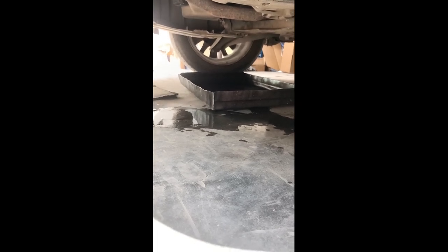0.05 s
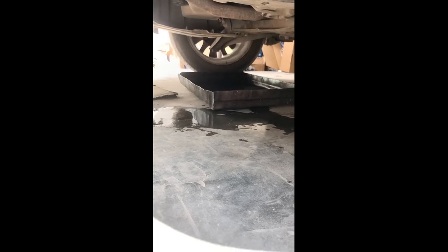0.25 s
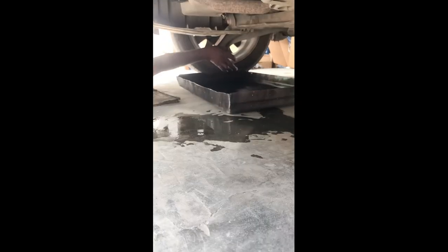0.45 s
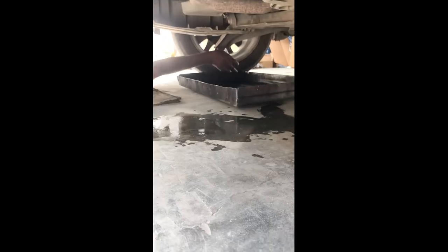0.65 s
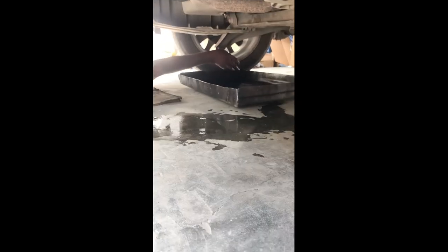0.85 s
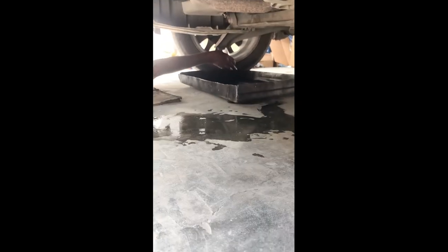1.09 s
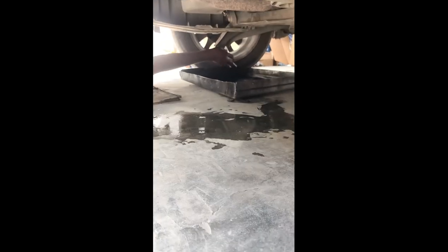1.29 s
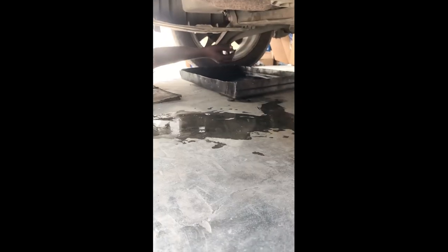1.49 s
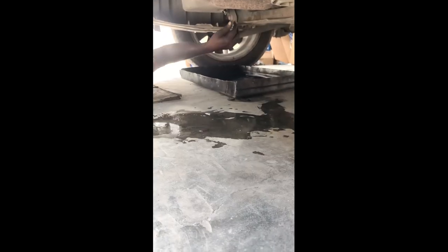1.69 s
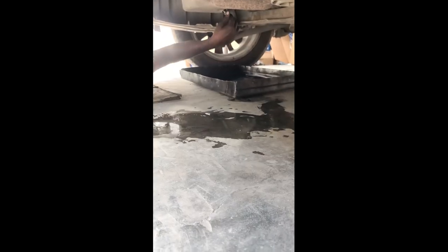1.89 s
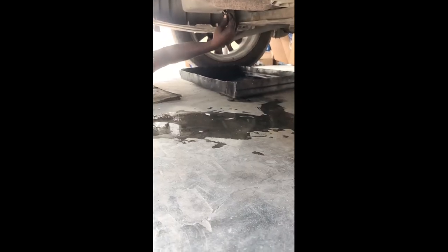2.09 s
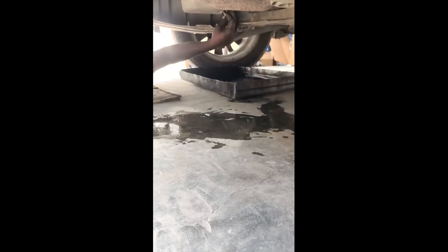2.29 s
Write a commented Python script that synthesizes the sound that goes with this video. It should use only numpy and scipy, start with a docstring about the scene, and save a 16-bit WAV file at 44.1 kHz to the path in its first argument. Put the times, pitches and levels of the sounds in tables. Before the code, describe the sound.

A metal tray scrapes twice across gritty concrete, rasping and ringing over a low rumble.

```python
"""A metal tray is pushed over wet concrete in two strokes, under a raised car in a garage. First a faint hiss
swells over a low workshop rumble, and dull bumps touch the microphone. From 0.26 s grit catches under the tray:
a dense run of tiny slips hisses and forces the sheet metal to groan, rasp and ring. Near 1.2 s the tray rocks
to rest and its modes ring on in free decay. It scuffs once as it settles, and a few faint ticks follow.
Throughout, the left microphone port faces the tray."""
import sys
import numpy as np
from scipy import signal
from scipy.fft import rfft, irfft, next_fast_len
from scipy.io import wavfile
from scipy.ndimage import uniform_filter1d

SR = 44100
rng = np.random.default_rng(int(sys.argv[2]) if len(sys.argv) > 2 else 0)


def dump_mix(stems):
    """Bounce the given channels to the path in sys.argv[1] as a 16-bit WAV at rate SR."""
    frames = np.atleast_2d(stems).T  # one column per channel
    limited = np.clip(frames, -1, 1)  # hard clip at full scale
    pcm = np.round(limited * 32767).astype(np.int16)
    wavfile.write(sys.argv[1], SR, pcm)


N = 108045
T = np.arange(N) / SR

# spectrum of the workshop rumble: f/Hz, level/dB
RUMBLE_SPECTRUM = [(20, -31.5), (50, -16.5), (90, -17.5), (135, -16), (165, -17.5), (200, -12),
                   (240, -26.5), (290, -16), (360, -28), (520, -31.5), (720, -39.5), (1000, -41.5),
                   (1400, -37.5), (2000, -45.5), (3200, -54.5), (5500, -64.5), (7000, -64.5), (9600, -77.5),
                   (12000, -76.5), (15000, -74)]
# left-right coherence of the diffuse field: f/Hz, coherence/1
ROOM_COHERENCE = [(60, 0.98), (200, 0.95), (500, 0.48), (900, 0.084), (2000, 0.086)]
# reverberation time of the garage: f/Hz, T60/s
GARAGE_DECAY = [(200, 2.5), (500, 3.4), (1000, 0.58), (2000, 0.5), (4000, 0.33), (10000, 0.078)]
# dull bumps on the microphone: t/s, level/dB, width/s, left minus right/dB
BUMP_PULSES = [(.06, -36.5, 0.16, -13.5), (.215, -27.5, 0.0426, -39), (.41, -37.5, 0.0413, -5.5),
               (1.06, -34, .025, -23.5)]
# envelope of the opening hiss: t/s, level/dB
HISS_ENVELOPE = [(0, -15), (.06, -5.5), (.15, 1), (.26, 2.5), (.32, -21.5)]
# spectrum of that hiss: f/Hz, level/dB
HISS_SPECTRUM = [(300, -27), (1200, -88), (3000, -48.5), (5500, -51), (9600, -55), (15000, -56)]
# single grains cracking, and at 1.331 s one longer scuff as the tray settles: t/s, level/dB, T60/s
CRACKS_AND_SCUFF = [(0.241, -31, 0.015), (0.256, -7, 0.026), (0.731, -10.5, .026), (1.331, -21.5, .085),
                    (1.484, -39.5, .05), (1.545, -41, .05)]
# spectrum of a crack: f/Hz, level/dB
CRACK_SPECTRUM = [(300, -16.5), (1500, -12.5), (4000, -17.5), (9600, -17.5), (15000, -23.5)]
# envelope of the crunch under the corners: t/s, level/dB
GRIT_ENVELOPE = [(0.258, -36), (0.284, -28), (0.468, -27), (0.612, -27), (0.636, -46), (0.662, -42.5),
                 (0.68, -60.5), (0.72, -64.5), (0.732, -32), (0.772, -34), (0.784, -35), (0.81, -29),
                 (0.936, -28), (0.985, -22.5), (1.14, -28.5), (1.225, -26.5), (1.262, -40.5), (1.30, -83)]
# spectrum of the crunch: f/Hz, level/dB
GRIT_SPECTRUM = [(200, -21.5), (330, 3), (1500, -21.5), (2800, 6.5), (4000, 5), (5500, 4.5), (9600, 3.5),
                 (15000, -3)]
# the tray catches on coarser grit: t/s, level above the steady crunch/dB, length/s
GRIT_CATCHES = [(.331, 7.5, 0.0042), (.382, 8, 0.015), (.414, 8, 0.014), (.444, 14, 0.0034),
                (.456, 5, 0.072), (.556, 6.5, .009), (.585, 8.5, 0.0096), (.646, 9.5, 0.041),
                (.768, 14, 0.003), (.812, 10, .009), (.861, 5, .008), (.904, 4.5, 0.0038), (.960, 4, 0.011),
                (.975, 3, 0.014), (1.151, 4, 0.0095)]
# tray modes: f/Hz, first-stroke level/dB, second-stroke level/dB, T60/s
TRAY_MODES = [(205, -15, -22, 3), (296, -24, -28.5, 4.5), (334.6, -19, -37.5, 0.7), (375, -25, -4.5, 1.8),
              (407, -19, -16.5, 3.1), (414.5, -23, -14, 2.2), (431.8, -8, -8.5, 0.58),
              (440.8, -12.5, -9.5, 2.2), (493.5, -13, -18, 2.8), (526, -16, -18.5, 2.5),
              (534.3, -14, -16, 1.8), (560, -15, -12, 0.9), (605.8, -5.5, 0.5, 0.3),
              (774.4, -12, -8.5, 1.0), (794, -9, -5.5, .9), (868, -6.5, -27.5, 0.33), (1010, -8, -3, 0.68),
              (1030, -18.5, -13.5, 1.4), (1160, -3.5, -5, 0.37), (1250, -19, -17, .8),
              (1383, -2, -0.5, 0.36), (1485, -4.5, -7, 0.17), (1611, -3.5, -6.5, .3), (1677, -4, -7, 0.32),
              (1696, -12.5, -6, 0.63), (1837, -9, -9, .4), (1953, -8.5, -2.5, 0.37)]
# envelope of the sheet's low groan: t/s, level/dB
GROAN_ENVELOPE = [(.258, -32.5), (.29, -21.5), (.335, -16.5), (.39, -14.5), (.46, -21.5), (.58, -24.5),
                  (.65, -44), (.72, -43.5), (.735, -35), (.79, -45), (.82, -24.5), (.89, -26), (.96, -20.5),
                  (1.08, -16), (1.2, -24.5), (1.29, -51)]
# spectra of the groan: f/Hz, first-stroke level/dB, second-stroke level/dB
GROAN_SPECTRA = [(120, -21, -36), (202, 13, 2.5), (247, -21, -13), (314, 15, -3), (347.4, 5, 6.5),
                 (405, 9.5, 14.5), (470, 13.5, 8.5), (512, 12.5, 11), (554, 17.5, 16), (706, 5.5, -1.5),
                 (830, 16, 11.5), (900, 12.5, -3.5), (1020, -8.5, 1.5), (1970, -31, -22.5)]
# sliding friction that drives the rasp and the modes: t/s, level/dB
DRAG_ENVELOPE = [(.258, -33), (.29, -27.5), (.35, -22.5), (.44, -22), (.575, -22), (.64, -31), (.72, -55.5),
                 (.734, -29.5), (.79, -38), (.82, -24.5), (.86, -32.5), (.92, -23.5), (.95, -25),
                 (1.0, -22), (1.2, -24), (1.25, -30.5), (1.31, -46.5)]
# spectra of the rasp: f/Hz, first-stroke level/dB, second-stroke level/dB
RASP_SPECTRA = [(290, -54, -17), (760, 7.5, 11.5), (954, 11.5, 10), (1075, 13.5, 16), (1150, 23.5, 20.5),
                (1380, 11.5, 11), (1505, 17, 18), (1668, 14, 17.5), (1948, 11, 10.5), (2080, 15, 15),
                (2153, 3, 14), (2240, 13.5, 11), (2600, 8, 4), (4640, 0, 0), (12000, -31, -44)]
# left-right coherence of the tray's scattered sound: f/Hz, coherence/1
TRAY_COHERENCE = [(300, 0.71), (650, 0.37), (1200, 0.15), (2200, 0.42), (4000, 0.17)]
# phase delay of the right port: f/Hz, delay/ms
RIGHT_DELAY = [(300, 0.051), (700, 0.25), (950, 0.31), (1500, 0.36), (2700, 0.464)]
# frequency response of the left port: f/Hz, level/dB
LEFT_RESPONSE = [(200, -5), (400, 0), (1000, 4), (2000, 3), (3000, 0), (5500, -1), (6800, -12), (8000, 3),
                 (9000, 12), (9800, 15.5), (11000, 2.5), (12800, 7), (14000, -5.5), (15500, -31)]
# frequency response of the right port: f/Hz, level/dB
RIGHT_RESPONSE = [(200, -4), (400, 0.5), (1000, 5.5), (1500, -3), (2400, -4.5), (4400, -12), (7000, -17),
                  (8500, -22.5), (10000, -27.5), (11500, -17.5), (12800, -9.5), (15500, -16.5)]

SECOND_STROKE_S, ATTACK_S, RELEASE_DB_PER_S = 0.93, 0.0018, 353.5
SLIPS_PER_S, SLIP_SPREAD_DB, JUDDER_HZ = 6000, 2.5, 63
GRAINS_PER_S, GRAIN_SPREAD_DB, CLUMP_DB, CLUMP_HZ = 3100, 2, 1.95, 76
REST_S, REST_WIDTH_S, REST_DB, REST_BELOW_HZ = 1.205, 0.045, -7.5, 349


def amp(db):
    """Amplitude ratio of a level in decibels."""
    return 10 ** (np.asarray(db) / 20)


def unit_rms(x):
    """Normalisation to unit mean power."""
    return x / np.sqrt(np.mean(x ** 2) + 1e-20)


def at_hz(points, hz):
    """Interpolation on a logarithmic frequency axis."""
    f, value = np.transpose(points)
    return np.interp(np.log(np.maximum(hz, 1)), np.log(f), value)


def colour(x, points):
    """Minimum-phase filtering: folding the cepstrum makes the given response causal."""
    size = 2 * next_fast_len(N // 2 + SR // 8)
    cepstrum = irfft(np.log(amp(at_hz(points, np.fft.rfftfreq(size, 1 / SR)))), size)
    cepstrum[1:size // 2] *= 2
    cepstrum[size // 2 + 1:] = 0
    return irfft(rfft(x, size) * np.exp(rfft(cepstrum)), size)[..., :N]


def convolve(x, response):
    """Convolution: the output of a linear path with the given impulse response."""
    size = next_fast_len(N + SR // 4)
    return irfft(rfft(x, size) * rfft(response, size), size)[..., :N]


def drift(corner_hz):
    """Random fluctuation: low-passed noise of unit rms."""
    r = np.exp(-2 * np.pi * corner_hz / SR)
    return unit_rms(signal.lfilter([1], [1, -2 * r, r * r], rng.standard_normal(N + SR // 8))[-N:])


def diffuse_noise(coherence):
    """Partial coherence: two white noises share a common part and an opposed part."""
    alike = np.clip(at_hz(coherence, np.fft.rfftfreq(N, 1 / SR)), -.99, .99)
    mid, side = rfft(rng.standard_normal((2, N)))
    return irfft(np.sqrt((1 + alike) / 2) * mid + np.sqrt((1 - alike) / 2) * side * [[1], [-1]], N)


def rumble():
    """Diffuse field of the workshop: steady noise, coherent between the ports in the bass."""
    return colour(diffuse_noise(ROOM_COHERENCE), RUMBLE_SPECTRUM)


def garage():
    """Reverberation: an impulse response whose octave bands decay exponentially, the treble fastest."""
    hz, noise = np.fft.rfftfreq(N, 1 / SR), rfft(diffuse_noise(ROOM_COHERENCE))
    centres, response = np.geomspace(125, 16000, 8), 0
    for centre, share in zip(centres, np.eye(len(centres))):
        band = irfft(noise * at_hz(np.c_[centres, share], hz), N)
        decay = amp(-60 * T / at_hz(GARAGE_DECAY, centre))
        response = response + band * decay / np.linalg.norm(decay)
    return response


def bumps(centre_hz=43, wander=0.22):
    """Pressure pulses at the ports: a slow, uneven oscillation under Gaussian envelopes."""
    hz = centre_hz * (1 + wander * drift(13))
    swing = np.sqrt(2) * np.sin(2 * np.pi * np.cumsum(hz) / SR)
    envelope = 0
    for s, db, width, pan_db in BUMP_PULSES:
        port_gains = amp(db + np.array([[pan_db], [-pan_db]]) / 2 - abs(pan_db) / 4)
        envelope = envelope + port_gains * np.exp(-((T - s) / width) ** 2)
    return envelope * swing


def hiss():
    """Amplitude-modulated noise: a faint hiss swells before the tray breaks loose."""
    s, db = np.transpose(HISS_ENVELOPE)
    return colour(rng.standard_normal((2, N)), HISS_SPECTRUM) * amp(np.interp(T, s, db)) * (T < s[-1])


def ticks():
    """Brittle fracture and scuffing: each cracking grain, and the settling tray's scuff, gives a noise burst
    that decays exponentially."""
    envelope = sum((T >= s) * amp(db - 60 * np.clip(T - s, 0, 1) / t60) for s, db, t60 in CRACKS_AND_SCUFF)
    return colour(envelope * rng.standard_normal((2, N)), CRACK_SPECTRUM)


def at_ports(x):
    """Path difference: sound from the tray reaches the right port later."""
    hz = np.fft.rfftfreq(N, 1 / SR)
    delay_s = at_hz(RIGHT_DELAY, hz) / 1000
    left, right = np.broadcast_to(x, (2, N))
    return np.array([left, irfft(rfft(right) * np.exp(-2j * np.pi * hz * delay_s), N)])


def scatter(t60, tail_db, smoothing_hz=70):
    """Scattering: a direct impulse and a dense decaying tail, evened out across frequency."""
    tail = diffuse_noise(TRAY_COHERENCE) * amp(-60 * T / t60)
    response = signal.unit_impulse(N) + amp(tail_db) * tail / np.linalg.norm(tail[0])
    spectrum = rfft(at_ports(response))
    power = uniform_filter1d(abs(spectrum) ** 2, int(smoothing_hz * N / SR))
    return irfft(spectrum / np.sqrt(power), N) * (T < 2 * t60)


def slips(per_s, spread_db):
    """Shot noise: impulses of random time, size and sign, at unit rms."""
    sizes = amp(spread_db * np.minimum(rng.exponential(1, N), 4)) * rng.choice([-1, 1], N)
    return unit_rms(sizes * (rng.random(N) < per_s / SR))


def sliding_gain(envelope):
    """Amplitude envelope of the sliding, with a sudden attack and an exponential release."""
    s, db = np.transpose(envelope)
    attack = np.clip((T - s[0]) / ATTACK_S, 0, 1)
    return attack * amp(np.interp(T, s, db) - RELEASE_DB_PER_S * np.maximum(T - s[-1], 0))


def grit(corners=3):
    """Incoherent sources: each corner crushes clumps of sand, harder at each catch."""
    catches_db = sum((T >= s) * db * np.exp(-((T - s) / length) ** 2) for s, db, length in GRIT_CATCHES)
    clumps = unit_rms(amp(CLUMP_DB * drift(CLUMP_HZ)))
    gain = sliding_gain(GRIT_ENVELOPE) * amp(catches_db) * clumps
    crunch = 0
    for _ in range(corners):
        grains = slips(GRAINS_PER_S, GRAIN_SPREAD_DB) * gain
        underside = scatter(t60=0.047, tail_db=-1)  # quick reflections between floor and car
        crunch = crunch + convolve(grains, underside)
    return colour(crunch / np.sqrt(corners), GRIT_SPECTRUM)


def ringing(gain_db=-4.5, smoothing_s=0.15):
    """Damped resonance: each tray mode stores energy from the slips and lets it decay."""
    force, drag = slips(SLIPS_PER_S, SLIP_SPREAD_DB), sliding_gain(DRAG_ENVELOPE)
    rocking = amp(REST_DB) * np.exp(-((T - REST_S) / REST_WIDTH_S) ** 2)
    modes = 0
    for hz, first_db, second_db, t60 in TRAY_MODES:
        r, w = amp(-60 / (t60 * SR)), 2 * np.pi * hz / SR
        coupling = np.where(T < SECOND_STROKE_S, amp(first_db), amp(second_db))
        # rocking to rest shakes the low modes
        drive = coupling * (drag + rocking / (1 + (hz / REST_BELOW_HZ) ** 4))
        envelope = np.sqrt(signal.lfilter([1 - r * r], [1, -r * r], drive ** 2) + 1e-18)
        tone = signal.lfilter([0, np.sin(w)], [1, -2 * r * np.cos(w), r * r], force * drive + 1e-18)
        # hold the tone's mean level to the envelope of the stored energy
        relative_power = uniform_filter1d((tone / envelope) ** 2, int(smoothing_s * SR))
        modes = modes + tone / np.sqrt(abs(relative_power) + 1e-6)
    return amp(gain_db) * modes


def sheet(envelope, spectra, t60, tail_db, judder_db, contacts):
    """Forced vibration: slips shake the sheet; its colour shifts as each stroke bears on other spots."""
    forces = sliding_gain(envelope) * np.array([
        slips(SLIPS_PER_S, SLIP_SPREAD_DB) * unit_rms(amp(judder_db * drift(JUDDER_HZ)))
        for _ in range(contacts)])
    spectra, first = np.array(spectra), T < SECOND_STROKE_S
    vibration = colour(forces * first, spectra[:, [0, 1]]) + colour(forces * ~first, spectra[:, [0, 2]])
    return sum(convolve(x, scatter(t60, tail_db)) for x in vibration) / np.sqrt(contacts)


def scene():
    """Superposition: the background, the garage's reverberation and the direct sound of grit and tray."""
    groan = sheet(GROAN_ENVELOPE, GROAN_SPECTRA, t60=0.33, tail_db=-6.5, judder_db=0.25, contacts=1)
    rasp = sheet(DRAG_ENVELOPE, RASP_SPECTRA, t60=0.088, tail_db=-1.5, judder_db=2.5, contacts=2)
    metal, sand = groan + rasp, grit() + ticks()
    reverberation = convolve(amp(-6) * metal[0] + amp(-6.5) * sand[0], garage())
    return rumble() + bumps() + hiss() + reverberation + sand + at_ports(ringing()) + metal


def record(dry, ceiling=0.95, cutoff_hz=15600):
    """Transduction: each port colours the sound, saturation rounds the peaks, a low-pass cuts the top."""
    ports = np.array([colour(dry[0], LEFT_RESPONSE), colour(dry[1], RIGHT_RESPONSE)])
    rounded = ports / (1 + (ports / ceiling) ** 6) ** (1 / 6)
    return signal.sosfilt(signal.ellip(12, .1, 90, cutoff_hz, fs=SR, output="sos"), rounded)


dry = scene()
out = record(dry)
dump_mix(out)
```